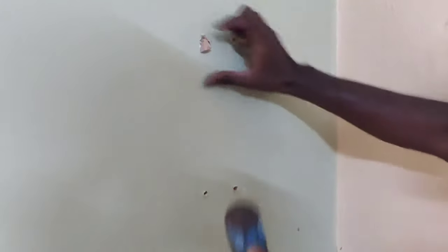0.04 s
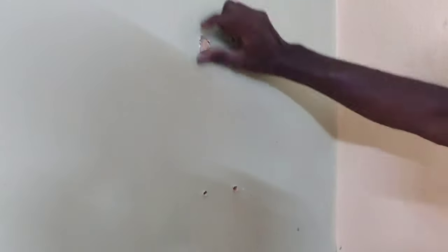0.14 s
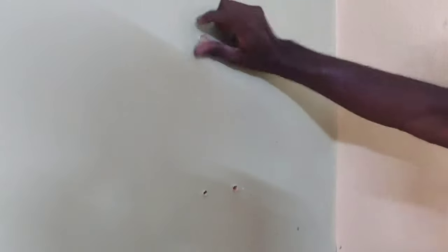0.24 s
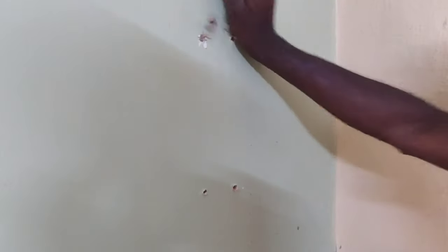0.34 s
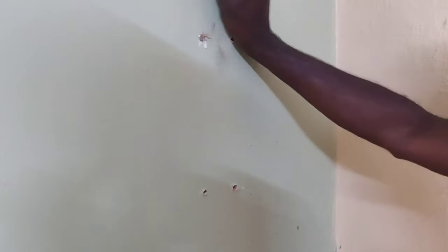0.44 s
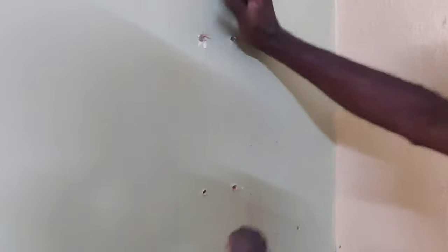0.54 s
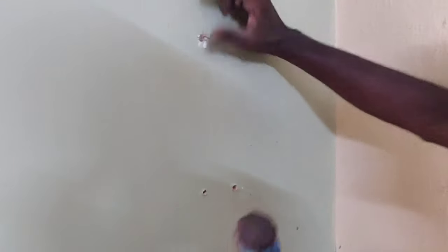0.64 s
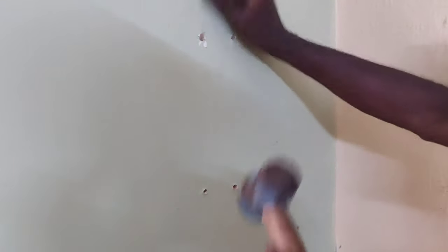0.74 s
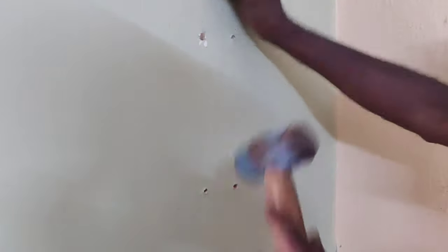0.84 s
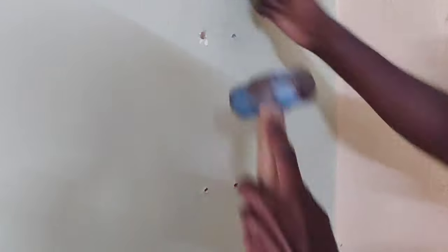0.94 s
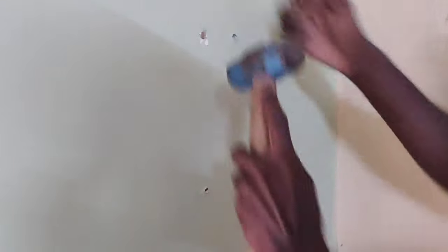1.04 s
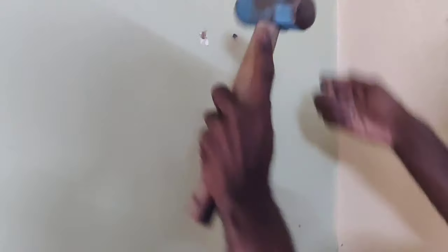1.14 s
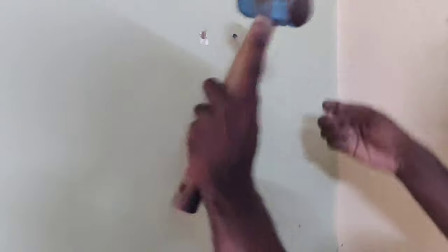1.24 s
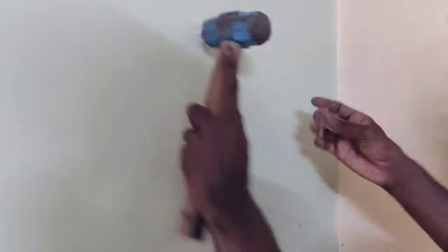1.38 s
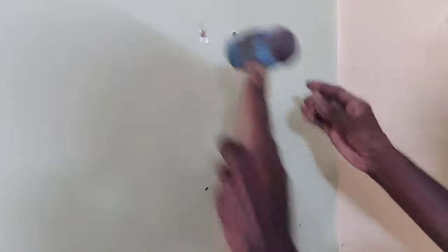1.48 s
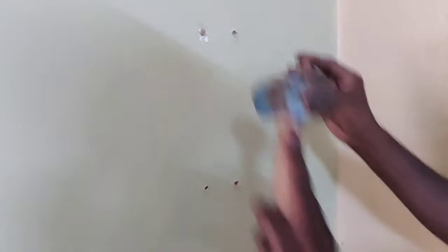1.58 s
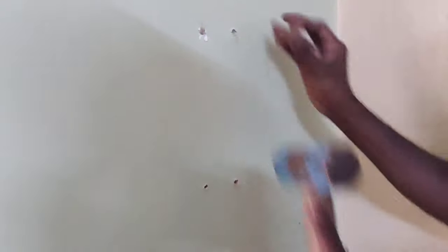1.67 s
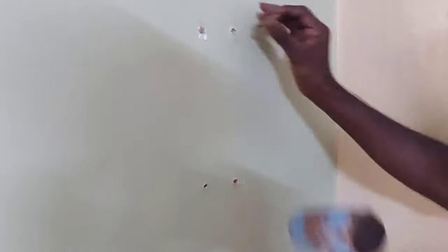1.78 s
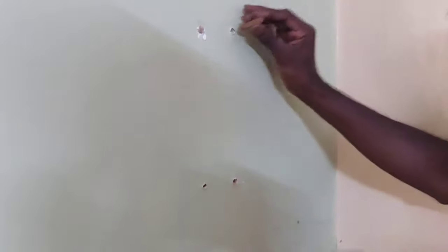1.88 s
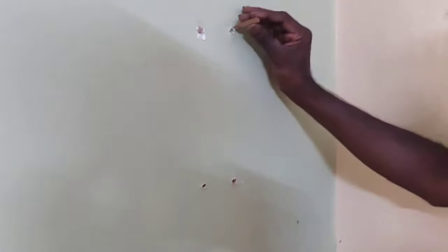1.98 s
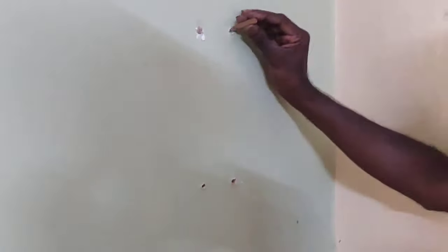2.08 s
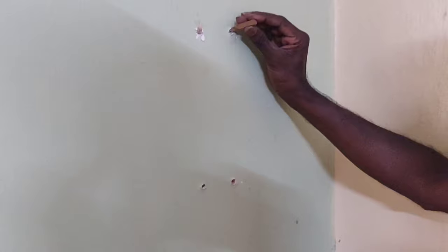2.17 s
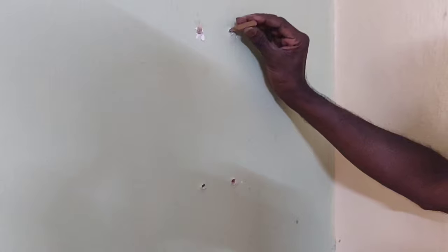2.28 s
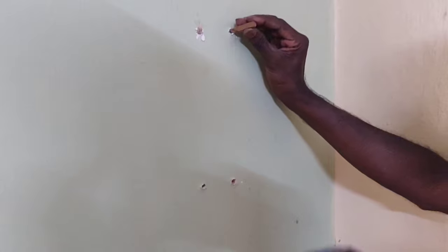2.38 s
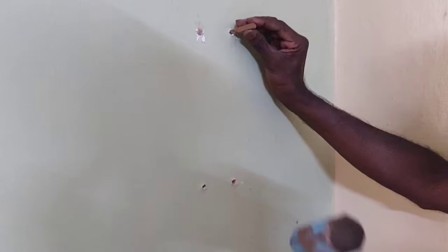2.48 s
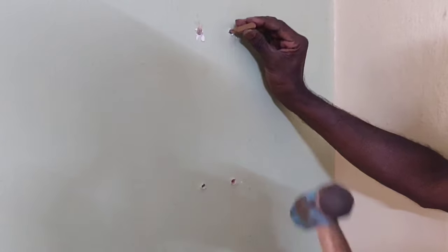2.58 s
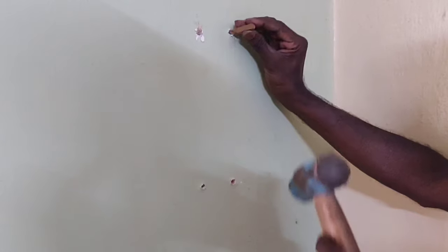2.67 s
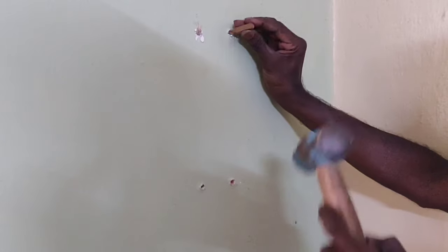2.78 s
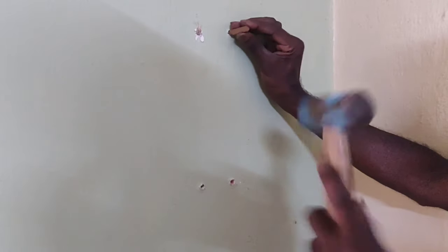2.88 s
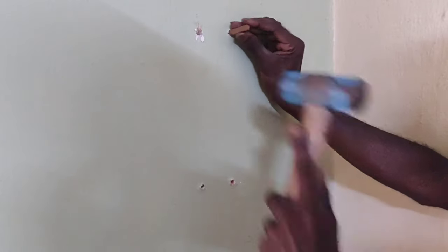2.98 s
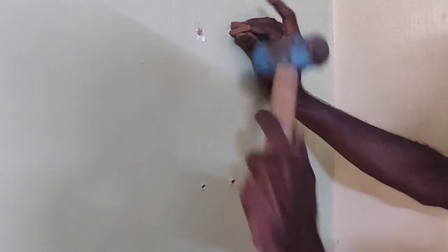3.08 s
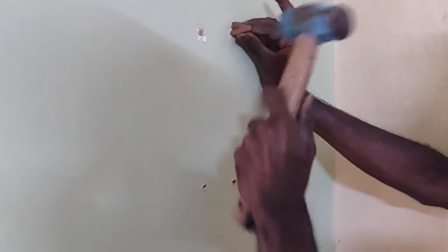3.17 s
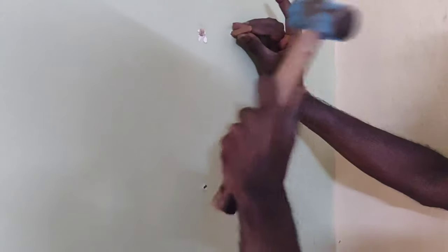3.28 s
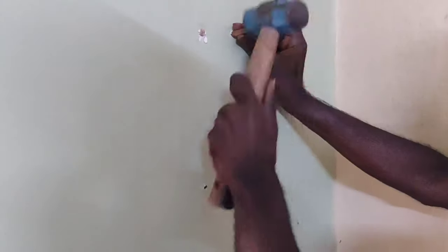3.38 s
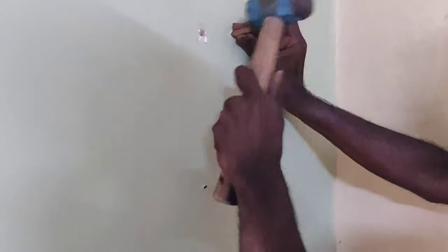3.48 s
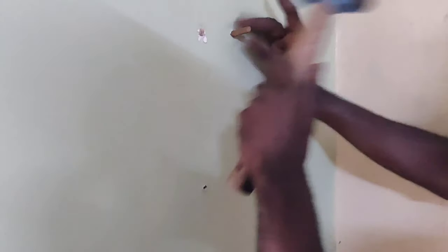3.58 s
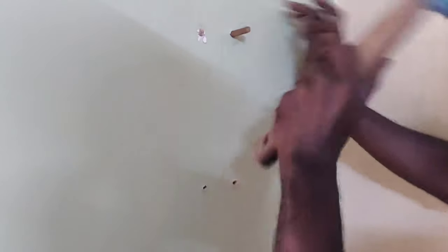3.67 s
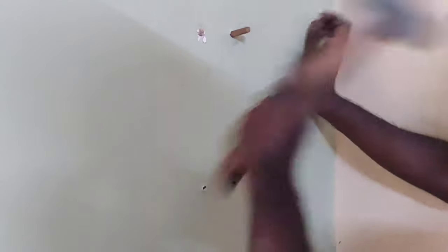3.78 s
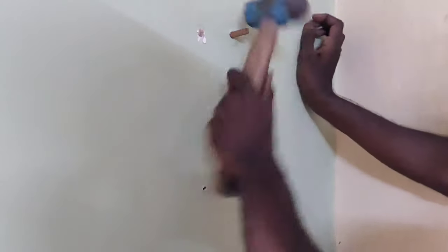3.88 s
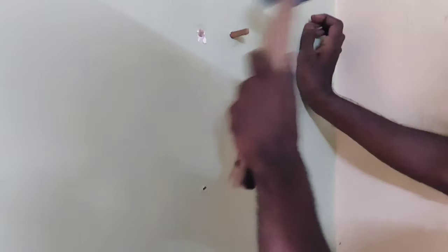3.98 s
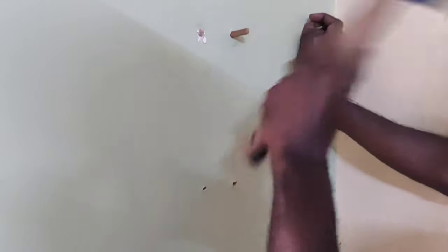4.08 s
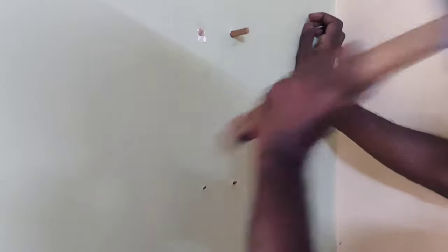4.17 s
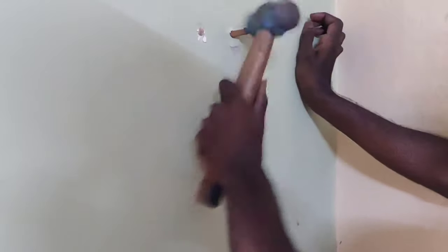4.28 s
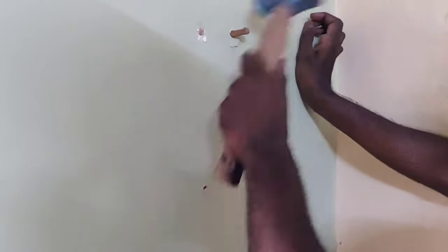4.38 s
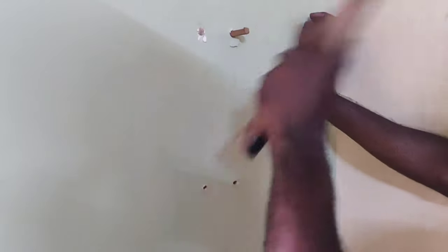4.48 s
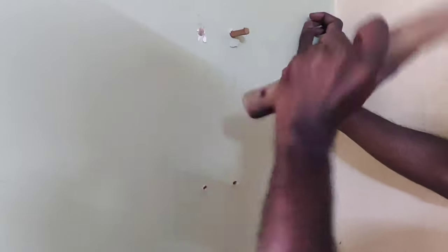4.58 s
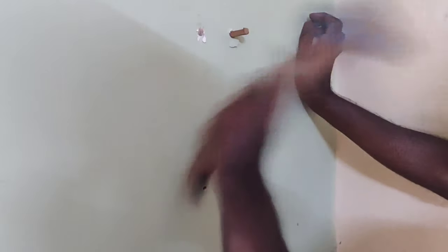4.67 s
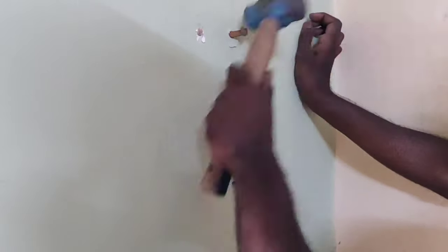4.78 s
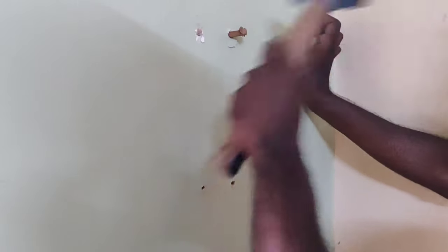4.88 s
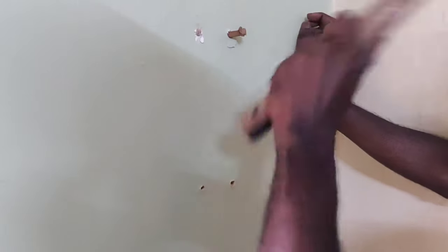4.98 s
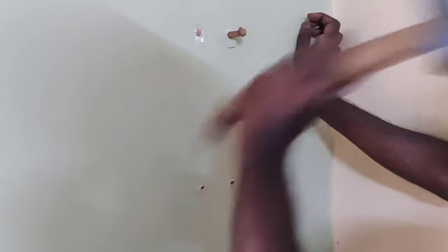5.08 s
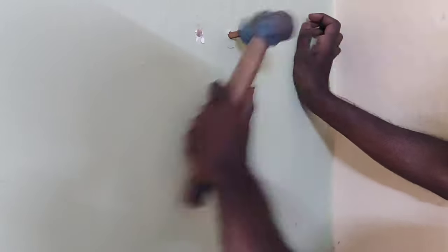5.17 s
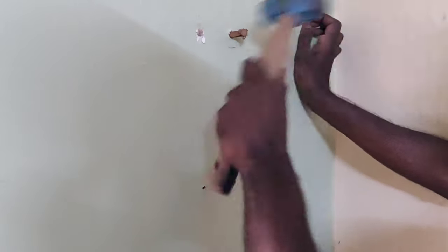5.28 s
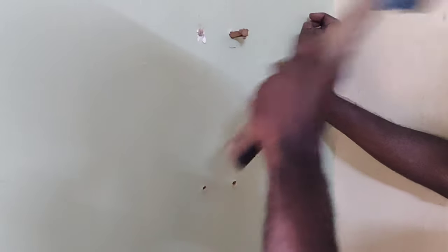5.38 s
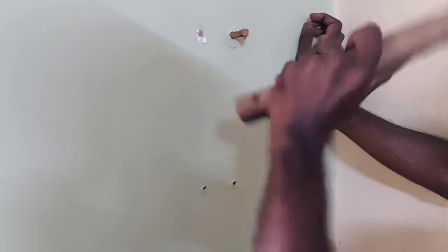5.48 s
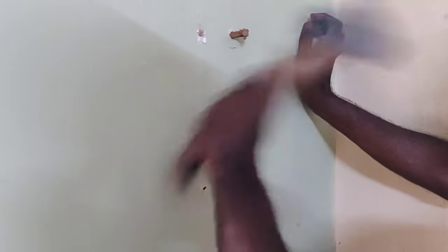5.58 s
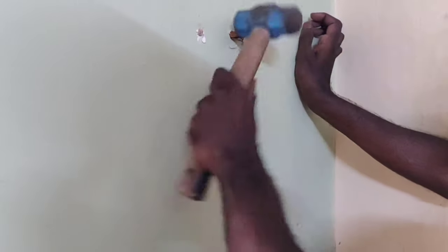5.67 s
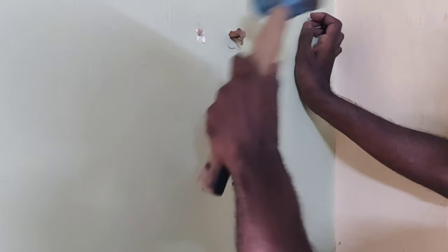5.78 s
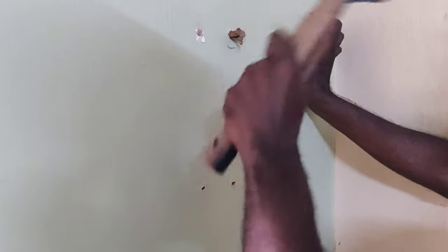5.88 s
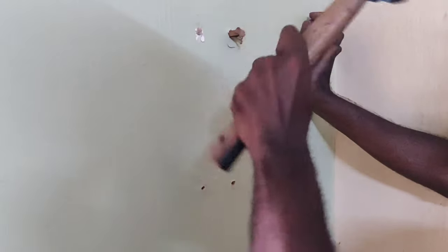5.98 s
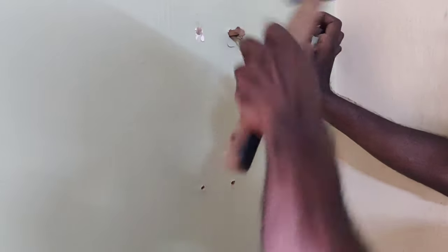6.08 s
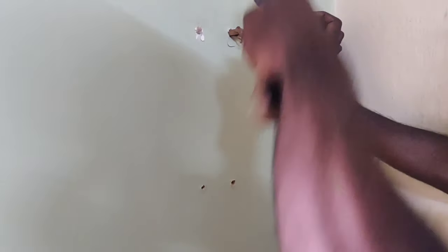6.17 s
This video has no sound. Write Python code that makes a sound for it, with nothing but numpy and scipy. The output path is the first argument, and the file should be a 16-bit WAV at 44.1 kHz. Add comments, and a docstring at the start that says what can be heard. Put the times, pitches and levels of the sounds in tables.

```python
"""A heavy hammer drives a wall plug into a plastered wall in a small, bare room, close to two microphone ports.
First fingers and plug brush and click on the plaster, by impulsive contact and sliding friction; low air rumbles on.
Then come seven blows, one alone and, two seconds later, six in quick succession: each thumps and bends the wall,
knocks in the hammer and crushes plaster round the plug, and the room's low modes boom after it.
Between the fifth and sixth blows metal rattles and rings in its own modes; light clicks and brushing end the scene."""
import sys
import numpy as np
from scipy import signal
from scipy.fft import rfft, irfft
from scipy.io import wavfile
from scipy.ndimage import uniform_filter1d, minimum_filter1d

SR = 44100
rng = np.random.default_rng(int(sys.argv[2]) if len(sys.argv) > 2 else 0)


def digitize_waveform(pressure):
    """Quantize a signal to 16-bit integers and store it at the path in sys.argv[1].

    Rows of a 2-D input are taken as channels; values are limited to [-1, 1].
    """
    field = np.atleast_2d(pressure).T
    bounded = np.clip(field, -1, 1)
    quanta = np.round(bounded * 32767).astype(np.int16)
    wavfile.write(sys.argv[1], SR, quanta)


N = 275184
RING = SR  # length of every response [samples]
BINS = np.fft.rfftfreq(8192, 1 / SR)  # frequency axis of all contact spectra [Hz]

# hammer blows, all levels relative: (time [s], thump [dB], wall flex [dB], low knock [dB], high knock [dB],
# plug snap [dB], snap frequency [Hz], snap width [Hz], crush [dB], crush corner [Hz], crush tilt [dB/octave],
# room against near sound for the body [dB], the same for the crack [dB])
BLOWS = [(1.307, 23, 27, 30, 26, 15, 5340, 2670, 24, 2920, -1.5, 6, 8.5),
         (3.3258, 30, 31.5, 23.5, 8, 15, 5400, 2200, 1, 14000, -2.3, -2.5, -3.5),
         (3.8088, 36.5, 40.5, 35.5, 21, 16, 6400, 2700, 21.5, 9900, -0.5, -5.5, -7),
         (4.2458, 37, 39.5, 28, 33, 4, 6000, 2700, 23.5, 10900, 0.3, -2.5, -4.5),
         (4.691, 37, 40, 30, 33, 15, 6160, 2700, 22.5, 9900, -1.5, -4, -5),
         (5.136, 30, 32.5, 23.5, 20.5, 15, 6000, 2000, 21, 15200, 1.63, 2, 1.5),
         (5.5911, 34, 13, 36.5, 32, 23.5, 5950, 2700, 24, 11300, 4, -3.5, -7)]
# the dull push into the wall: (frequency [Hz], relative level [dB])
THUMP = [(30, 0), (50, -11), (70, -0.5), (110, 3), (290, -10.5), (450, -9), (570, -11.5), (690, -12),
         (1200, -22), (3000, -28), (16000, -119)]
# how the wall radiates the crack of the plaster: (frequency [Hz], gain [dB])
WALL_COLOUR = [(100, -12), (700, -9), (1100, -8), (1520, 1.5), (1770, -2), (2000, 0), (2280, -2.5),
               (2600, 0), (3100, 1.5), (4500, -.5), (16000, 0)]
FLEX_HZ, FLEX_WIDTH_HZ = 260.6, 204  # the wall's broad flexing resonance
KNOCK_DELAY_S = 0.00176  # the plug crushes first, then the head meets the solid wall
KNOCK_DB = 2


def hammer(waves, level_db=0.05, knock_room_db=-10.0):
    """Impact excitation: thump and flex of the wall, a drier hammer knock, the crack of plug and plaster."""
    out, ring = np.zeros((2, N)), wall_ring()
    for blow in BLOWS:
        s, thump_db, flex_db, low_db, high_db, snap_db, snap_hz, snap_width_hz = blow[:8]
        crush, (body_room_db, crack_room_db) = blow[8:11], blow[11:]
        thump = thump_db + read(THUMP, BINS)
        flex = flex_db + resonance(FLEX_HZ, FLEX_WIDTH_HZ)
        snap = snap_db + resonance(snap_hz, snap_width_hz)
        crushing = contact(*crush) + read(WALL_COLOUR, BINS)
        head = KNOCK_DB + knock(low_db, high_db)
        add(out, s, strike(together(thump, flex), body_room_db, waves + ring))
        add(out, s, wall_flex(flex_db))
        add(out, s + KNOCK_DELAY_S, strike(head, body_room_db + knock_room_db, ring))
        add(out, s, strike(together(snap, crushing), crack_room_db, ring))
    return amp(level_db) * out


# hammer head and handle, low and high knock: (frequency [Hz], width [Hz])
KNOCK = [(850, 280), (1270, 330)]


def knock(*levels_db):
    """Resonance: the hammer's two woody peaks; where the head lands sets the strength of each."""
    peaks = [db + resonance(hz, width_hz) for db, (hz, width_hz) in zip(levels_db, KNOCK)]
    return together(*peaks)


def wall_flex(db, hz=274, t60=0.17, rise=0.0064, gain_db=-50):
    """Damped oscillation: the wall's main bending mode, a few firm cycles, alike at both ports."""
    t = np.arange(RING) / SR
    envelope = (1 - np.exp(-t / rise)) * amp(db + gain_db - 60 * t / t60)
    swing = np.sin(2 * np.pi * hz * t) * envelope
    return np.array([swing, swing])


# modes in which the struck wall rings: (frequency [Hz], relative level [dB], decay time T60 [s])
WALL_MODES = [(266.5, -53, .33), (578, -56, .55), (623, -56, .55), (711, -58, .6), (834, -54, .6),
              (854, -55, .6), (941, -54, .6), (1026, -56, .55), (1200, -54, .55), (1320, -57, .5),
              (1501, -54, .6), (1866, -56, .55), (2440, -57, .5), (3184, -54, .5)]


def wall_ring():
    """Modal decay: the wall gives under a blow and rings on in its own modes."""
    t = np.arange(RING) / SR
    modes = np.zeros((2, RING))
    for hz, db, t60 in WALL_MODES:
        phase = rng.random((2, 1))  # in cycles, one for each channel
        modes += amp(db - 60 * t / t60) * np.sin(2 * np.pi * (hz * t + phase))
    return paired(modes)


# light contacts of plug, fingers and chips on the plaster: (time [s], relative level [dB], corner [Hz],
# tilt [dB/octave], snap [dB], snap frequency [Hz], snap width [Hz], room against near sound [dB])
CLICKS = [(0.2265, 2.5, 13500, 10, -4.5, 1850, 300, 0.5), (0.279, 4.5, 10300, 10, 3, 5900, 2200, 0.5),
          (0.2835, -7.5, 10000, 2, -8, 5800, 2200, 2), (0.304, -13.5, 10000, 0.5, -3.5, 5800, 2200, -19),
          (0.752, 18.5, 7000, 1, 20.5, 5930, 2700, -2), (0.9307, 3.5, 4460, -1, 8.5, 1840, 900, -2),
          (1.116, -14.5, 4000, -3, -20, 1900, 900, -2), (1.291, 3, 7950, 3.5, -12, 1900, 900, 3.5),
          (1.996, -11.5, 11200, 7.5, -13, 4600, 900, -10), (2.7905, -6, 9000, 5, -3, 5400, 1500, 1),
          (2.802, -8, 9000, 5, -3, 5400, 1500, 1), (3.048, -20, 9000, 9, -17, 6400, 1200, -6),
          (3.771, -2, 14000, 5.5, -15, 5800, 2700, -0.5), (4.2889, 10, 7060, 5, 11, 5800, 2000, -10),
          (4.618, -0.5, 6940, 9, 6, 6400, 1000, 2), (4.7305, 8, 9900, -1, 7, 5800, 2700, -3),
          (5.992, -13, 10000, 3, -19, 3100, 600, 9), (6.2046, -12.5, 13070, 4, -13, 6400, 1500, -3)]


def clicks(waves, scatter=0.87):
    """Impulsive contact: too small to radiate bass and crisper than a blow; the touched piece snaps along."""
    out = np.zeros((2, N))
    for s, *touch, snap_db, snap_hz, snap_width_hz, room_db in CLICKS:
        snap = snap_db + resonance(snap_hz, snap_width_hz)
        add(out, s, strike(together(contact(*touch), snap), room_db, waves, scatter))
    return out


# modes of a struck piece of metal: (frequency [Hz], relative level [dB], decay time T60 [s])
METAL = [(1082, -54, .7), (1561, -57, .7), (2003, -56, .6), (2503, -58, .8), (2750, -54, .5),
         (2828, -48.5, .45), (3241, -57, .6), (3335, -57, .5), (3475, -50, .5), (3905, -52, .5),
         (3994, -53, .45), (4156, -55, .7), (4355, -45, .6), (4520, -53, .5), (4632, -51, .75),
         (4775, -51, .55), (4850, -46, .6), (4950, -47.5, .55), (5039, -52, .55), (5118, -51, .5),
         (5308, -51, .7), (5631, -53, .7), (5700, -50, .5), (5812, -47, .75), (5900, -52, .5),
         (6094, -51, .45), (6169, -50, .45), (6290, -50, .5), (6410, -45, .6), (6536, -46, .6),
         (6660, -48, .6), (6732, -44, .6), (6830, -48, .55), (7190, -49, .5), (7225, -46, .5),
         (7267, -44, .55), (7580, -51, .6), (7862, -51, .7), (7973, -52, .45), (8365, -51, .6),
         (8605, -53, .45), (8832, -50, .45), (9049, -55, .6)]
# contacts of the rattling metal: (time [s], relative clang level [dB], relative tick level [dB])
RATTLE = [(4.8323, 73.5, 19), (4.8482, 64.5, 18.5), (4.866, 64.5, 12), (4.8831, 64.5, 4), (4.9038, 66, -3)]
RING_DB = 13  # raises the after-ring of the modes


def metal(sharpness=60, room_db=7, spread_hz=20, tick_hz=13000, tick_tilt_db=12, count=5):
    """Modal vibration: each contact is a tick and a rough clang; the modes ring on as beating clusters."""
    power = sum(amp(2 * db) / (1 + (2 * sharpness * (BINS / hz - 1)) ** 2) ** 2 for hz, db, _ in METAL)
    modes_db = 10 * np.log10(power)
    t, out = np.arange(RING) / SR, np.zeros((2, N))
    for s, clang_db, tick_db in RATTLE:
        tick = contact(tick_db, tick_hz, tick_tilt_db)
        add(out, s, strike(together(clang_db + modes_db, tick), room_db, 0))
    for hz, db, t60 in METAL:
        partial_hz = hz + spread_hz * rng.uniform(-1.05, 1, (count, 1))
        cluster = np.exp(2j * np.pi * partial_hz * t)
        ports = np.exp(2j * np.pi * rng.random((2, count)))  # each partial has its own phase at each port
        beating = (ports @ cluster).imag / np.sqrt(count)
        add(out, RATTLE[0][0], beating * amp(RING_DB + db - 60 * t / t60))  # from the first contact
    return out


# strokes of hand and arm along the wall: (middle [s], length between 1/e points [s], level [dB])
STROKES = [(0.197, 0.29, -56), (0.305, .06, -50), (0.725, 0.06, -58), (3.192, 0.98, -64), (4.655, .1, -58),
           (6.202, .3, -67)]
# spectrum of the brushing: (frequency [Hz], relative level [dB])
BRUSH_COLOUR = [(100, 6), (400, 11), (900, 1), (2000, 0), (4000, -2), (6300, 10.5), (9000, -1.5),
                (15000, -30)]
RESTING_DB = -66.5  # the hiss under and between the strokes


def brushing(grain_db=3, size=300):
    """Sliding friction: skin on plaster gives a faint, grainy hiss that swells with each stroke."""
    t = np.arange(N) / SR
    level = np.full(N, amp(RESTING_DB))
    for middle_s, length_s, db in STROKES:
        level += amp(db) * np.exp(-(2 * (t - middle_s) / length_s) ** 2)
    grain = np.tanh(evened(uniform_filter1d(rng.standard_normal(N), size)))
    hiss = coloured(paired(rng.standard_normal((2, N))), BRUSH_COLOUR) * amp(grain_db * grain)
    return level * evened(hiss)


# the room's steady air: (frequency [Hz], relative spectral density [dB])
AIR = [(25, -13), (40, -5.5), (52, -22), (66, -6), (80, -24), (112, 0.5), (150, -21), (260, -15),
       (380, -20), (520, -24.5), (850, -23.5), (1400, -29.5), (3500, -31), (7000, -38), (15000, -31)]
AIR_DB = -50  # rms level before the waver


def air(waver_db=1.0, size=3000):
    """Stationary noise: a low rumble of the room, wavering a little, under a faint steady hiss."""
    waver = evened(uniform_filter1d(uniform_filter1d(rng.standard_normal(N), size), size))
    noise = evened(coloured(paired(rng.standard_normal((2, N))), AIR))
    rumble = signal.sosfiltfilt(signal.butter(2, 200, fs=SR, output="sos"), noise)
    return amp(AIR_DB) * (noise + rumble * (amp(waver_db * waver) - 1))


def contact(db, corner_hz, tilt_db, steepness=9.5, bass_hz=400):
    """Contact time: little bass, a tilt up to the corner set by the contact's shortness, then a steep fall."""
    ratio = (BINS + 1) / corner_hz
    treble_loss = 1 + ratio ** steepness
    bass_loss = 1 + (bass_hz / (BINS + 1)) ** 2
    return db + tilt_db * np.log2(ratio) - 10 * np.log10(treble_loss * bass_loss)


def resonance(hz, width_hz):
    """Resonance: a peak with steep skirts, in dB, 6 dB down across its width."""
    detuning = hz / width_hz * (BINS / hz - hz / (BINS + 1))
    return -20 * np.log10(1 + detuning ** 2)


def together(*parts_db):
    """Incoherent addition: the power sum of spectra in dB."""
    return 10 * np.log10(sum(amp(2 * db) for db in parts_db) + 1e-10)


def strike(db, room_db, waves, scatter=1):
    """Convolution: one contact with spectrum db, heard directly and through the room."""
    response = near_field(scatter) + amp(room_db) * (room_tail() + waves)
    sound = signal.fftconvolve(response, causal(db)[None], axes=1)
    return sound / np.sqrt(1 + amp(2 * room_db))  # more room means less near sound


# direct sound and the nearest surfaces against the tail: (frequency [Hz], gain [dB])
DIRECT = [(30, -58), (100, -20), (190, -7.5), (290, -8), (400, -10.5), (600, -4), (1200, -2), (3000, 0.5),
          (6000, 4.5), (14000, 0.5)]
# share of the near sound that arrives scattered: (frequency [Hz], amplitude share at scatter 1 [0-1])
SCATTER = [(100, 1), (700, 0.53), (1400, 0.78), (3000, 1), (16000, 0.93)]


def near_field(scatter, port_lag_s=0.00012, size=4096):
    """Early reflections: the contact itself, then a quick cluster of crushing and echoes from wall, arm, corner."""
    t, hz = np.arange(size) / SR, np.fft.rfftfreq(size, 1 / SR)
    fade = np.exp(-(t / .0055) ** 2) + .22 * np.exp(-t / .012)
    cluster = paired(rng.standard_normal((2, size))) * fade
    cluster /= np.linalg.norm(cluster, axis=1, keepdims=True)
    share = np.clip(scatter * read(SCATTER, hz), 0, 1)
    first = np.array([t == 0, np.arange(size) == round(port_lag_s * SR)], float)  # the right port hears it later
    sound = irfft(share * rfft(cluster) + np.sqrt(1 - share ** 2) * rfft(first), size)
    sound *= np.hanning(2 * size)[size:]
    return coloured(np.pad(sound, ((0, 0), (0, RING - size))), DIRECT)


# reverberation of the diffuse tail: (frequency [Hz], decay time T60 [s])
ROOM_T60 = [(80, 1.2), (250, 1.84), (560, 0.78), (1400, 0.77), (3500, 0.62), (7000, 0.63), (14000, 0.42)]
# colour of the tail; in the bass the standing waves take over: (frequency [Hz], gain [dB])
DIFFUSE = [(30, -28), (55, -5), (110, -10.5), (300, -12), (480, 1), (680, 1), (900, 2), (16000, 1)]


def room_tail(rise=0.00055, build_cycles=0.83):
    """Diffuse reverberation: dense echoes of bare walls; bass builds up slowly, each band dies at its own speed."""
    hz, t, z = signal.stft(paired(rng.standard_normal((2, RING))), SR, nperseg=256)
    t60 = np.maximum(read(ROOM_T60, hz), .05)[:, None]
    z = z * amp(-60 * t / t60) * np.sqrt(2 * np.log(1000) / (t60 * SR))  # equal energy at any decay time
    z = z * (1 - np.exp(-hz[:, None] * (t + t[1]) / build_cycles))
    tail = signal.istft(z, SR, nperseg=256)[1][:, :RING]
    return coloured(tail * (1 - np.exp(-np.arange(RING) / SR / rise)), DIFFUSE)


# standing waves of the room: (frequency [Hz], relative level [dB], decay time T60 [s], build-up time [s])
ROOM_MODES = [(69.2, -2.5, 1.2, .02), (85.4, -8.5, 1.4, .02), (101.3, -5, .7, 0.013),
              (110.7, 1.5, 0.53, 0.24), (119.54, -5, .7, 0.034), (130.8, -3.5, .7, 0.027),
              (149.8, 2, 0.81, 0.012), (168.7, -4.5, 0.93, .02), (183.3, -3, 0.77, 0.022),
              (204.5, -2, 0.92, .01), (209.3, -4.5, 0.93, .01), (249.1, -4, 0.65, 0.16),
              (258, -7.5, 0.83, 0.04), (267.7, -3.5, 0.7, 0.021), (274.4, 1.5, 0.61, 0.035),
              (291, -0.5, 0.64, 0.029), (304.5, -1.5, 0.72, 0.018), (325.5, 4, 0.3, 0.03),
              (335.2, -5, 0.53, .04), (353.5, 4.5, 0.6, 0.026), (358, -3, 0.94, .02),
              (375.8, 1.5, 1.14, 0.073), (411.4, -1.5, 0.36, 0.016), (436.6, -1, 0.42, .04),
              (461, -4.5, 0.85, 0.0097), (492, -1, 1.2, 0.0035), (534, 0.5, 0.87, .02),
              (555, -3, 0.59, 0.018), (564, -3.5, 0.92, 0.024), (585.5, -1.5, .55, .02),
              (585, 0, 0.33, .02), (651, -6.5, 1.3, 0.022)]


def standing_waves(modes_db=-1.5):
    """Room modes: low standing waves, the same for every blow and click, with about unit gain across the bass."""
    t = np.arange(RING) / SR
    hz, db, t60, build_up = np.transpose(ROOM_MODES)[:, :, None]
    swell = amp(-60 * t / t60) * (1 - np.exp(-t / build_up))
    swell /= np.linalg.norm(swell, axis=1, keepdims=True)
    tones = np.sin(2 * np.pi * (hz * t + rng.random(hz.shape)))
    waves = (amp(db) * swell * tones).sum(0)
    return amp(modes_db) * waves / np.linalg.norm(waves) * np.sqrt(2 * np.ptp(hz) / SR)


# left-right likeness: (frequency [Hz], correlation [-1 to 1])
SAME = [(25, 0.98), (70, 0.98), (150, 0.95), (270, 0.85), (450, 0.63), (740, 0.33), (1200, 0.004),
        (16000, 0.063)]


def paired(x):
    """Spatial coherence: makes two unrelated channels alike in the bass, as at two nearby ports."""
    a, b = rfft(x)
    same = np.clip(read(SAME, np.fft.rfftfreq(x.shape[1], 1 / SR)), -1, 1)
    return irfft(np.array([a, same * a + np.sqrt(1 - same ** 2) * b]), x.shape[1])


def causal(db, size=4096):
    """Minimum phase: the shortest pulse with this spectrum (dB on the bins from 0 to SR / 2)."""
    log_gain = np.log(amp(np.r_[db, db[-2:0:-1]]))
    return np.fft.ifft(np.exp(np.conj(signal.hilbert(log_gain)))).real[:size]


def coloured(x, points):
    """Linear filtering: shapes each channel by a table (frequency [Hz], gain [dB])."""
    return signal.fftconvolve(x, causal(read(points, BINS))[None], axes=1)[:, :x.shape[1]]


def read(points, hz):
    """Interpolation: reads a table on a log-frequency axis."""
    f, value = np.transpose(points)
    return np.interp(np.log(hz + 1), np.log(f + 1), value)


def amp(db):
    """Logarithmic level: decibels to amplitude gain."""
    return 10 ** (np.asarray(db) / 20)


def evened(x):
    """Normalisation: scales to rms 1."""
    return x / np.sqrt(np.mean(x ** 2) + 1e-20)


def add(mix, s, sound):
    """Superposition: adds a stereo sound to the mix at time s."""
    part = mix[:, round(s * SR):][:, :sound.shape[1]]
    part += sound[:, :part.shape[1]]


def scene():
    """Superposition: all sources in the one room."""
    waves = standing_waves()
    return hammer(waves) + clicks(waves) + metal() + brushing() + air()


# response of the two microphone ports: (frequency [Hz], gain [dB])
LEFT_PORT = [(20, 6.5), (5300, 0.5), (6400, 3.5), (7300, -4.5), (8000, -11.5), (9300, -14), (10300, -43),
             (14000, -10), (15600, -30)]
RIGHT_PORT = [(20, 4.5), (5300, 0.5), (6400, -5), (8200, 2), (9500, -11), (10500, -19), (13000, -9.5),
              (15600, -10.5)]
EDGE_HZ = 15900  # upper band limit


def record(dry, size=90):
    """Transduction: each port colours the sound, a fast limiter holds the peaks, then the band limit."""
    x = np.vstack([coloured(dry[:1], LEFT_PORT), coloured(dry[1:], RIGHT_PORT)])
    gain = np.minimum(1, .93 / (abs(x).max(0) + 1e-9))
    x = x * uniform_filter1d(minimum_filter1d(gain, size), size)
    band_limit = signal.firwin(255, EDGE_HZ, window=("kaiser", 9), fs=SR)
    return signal.oaconvolve(x, band_limit[None], "same")


dry = scene()
out = record(dry)
digitize_waveform(out)
```